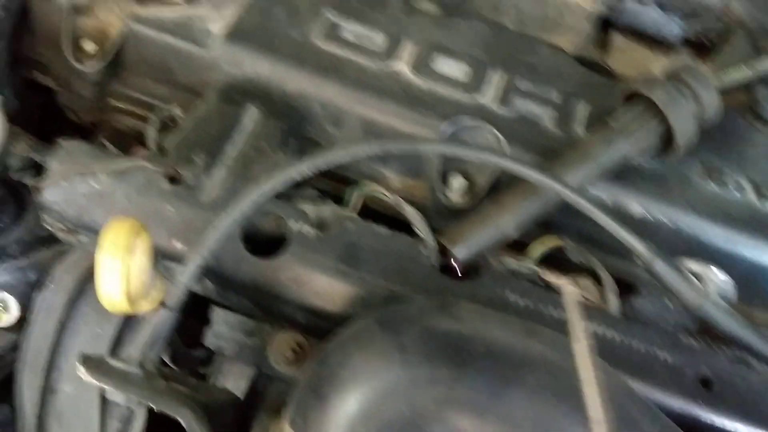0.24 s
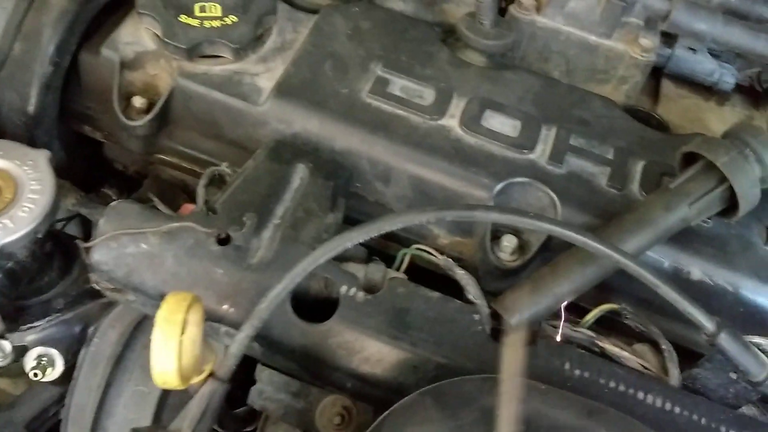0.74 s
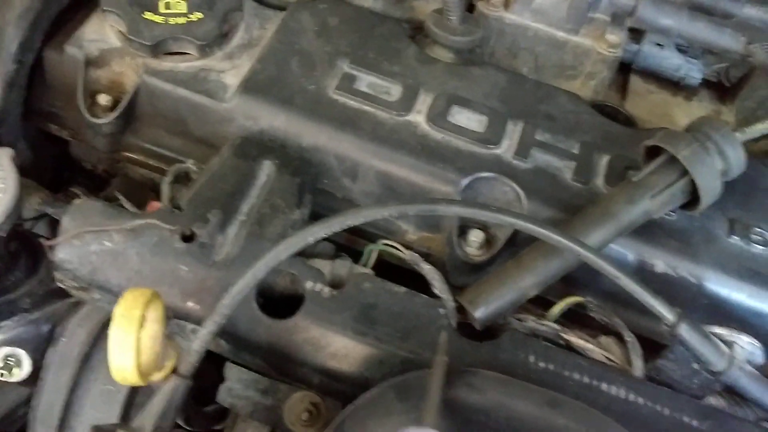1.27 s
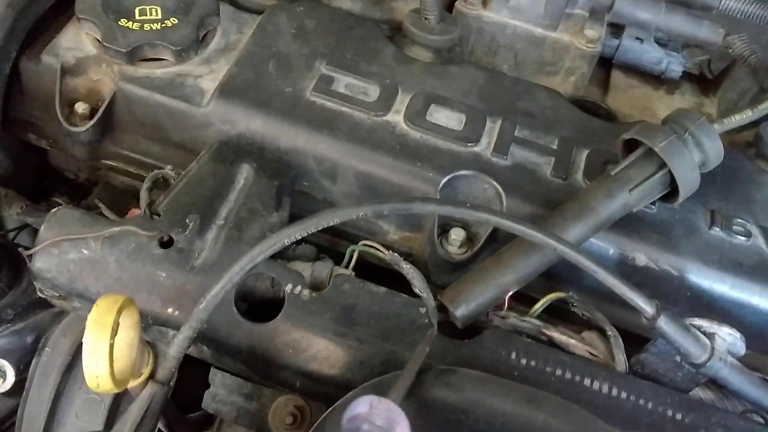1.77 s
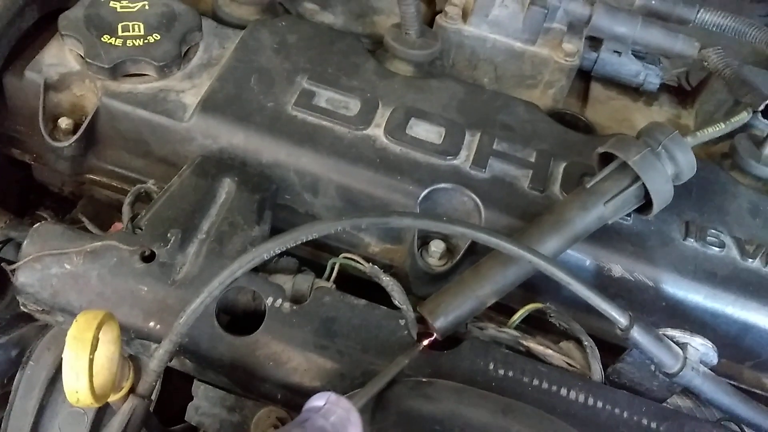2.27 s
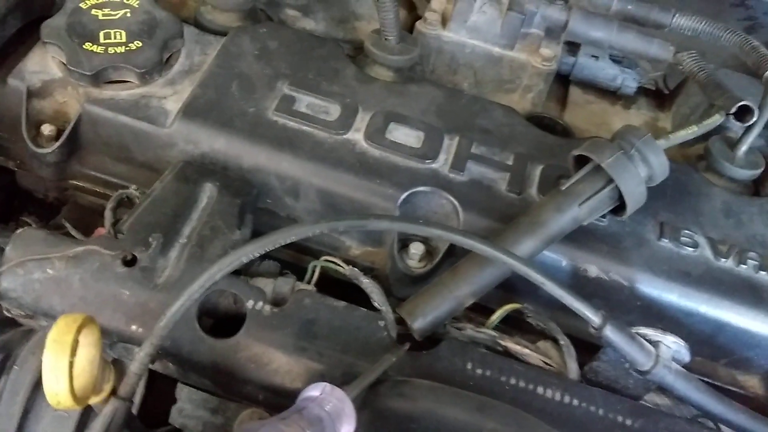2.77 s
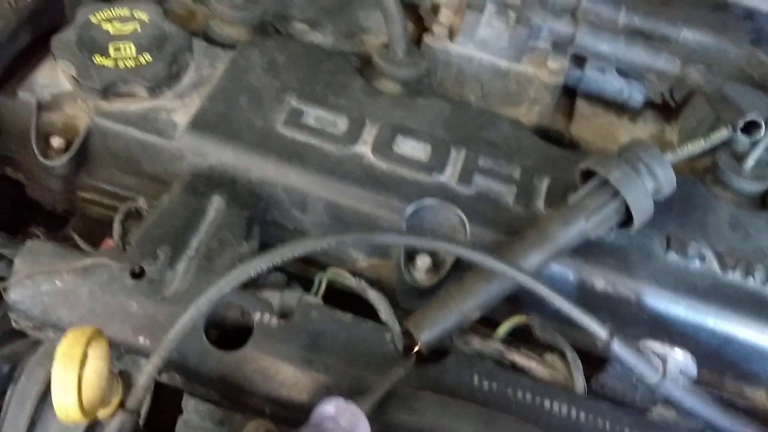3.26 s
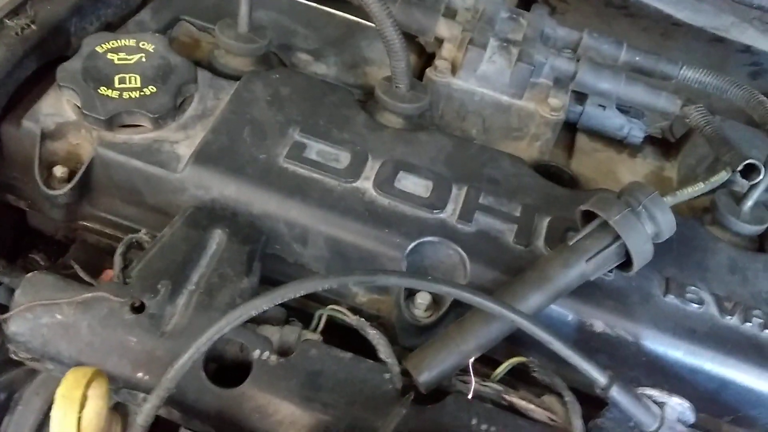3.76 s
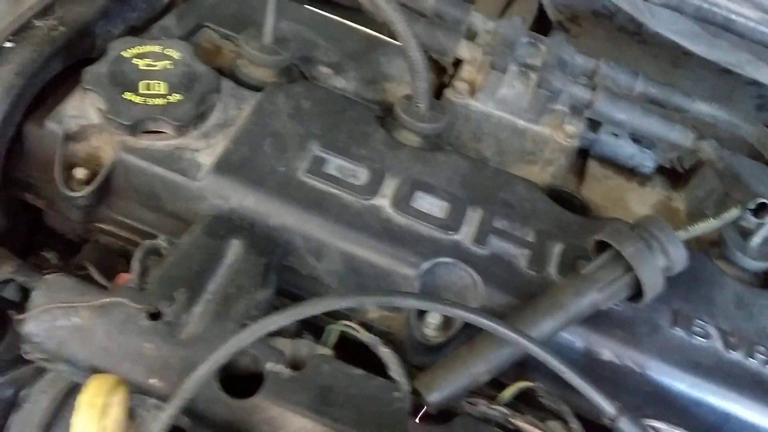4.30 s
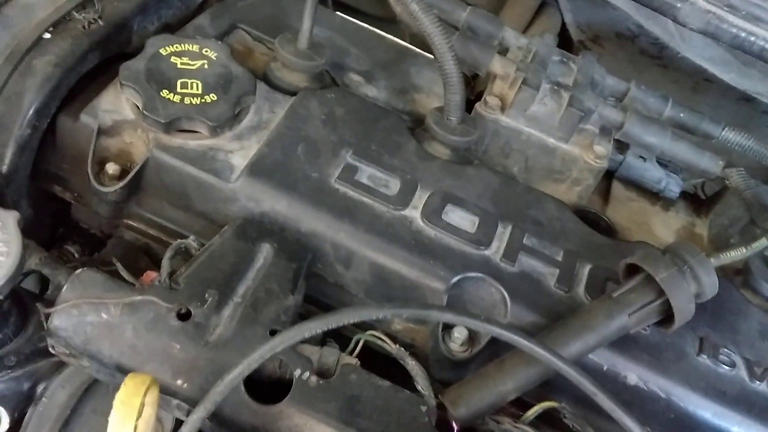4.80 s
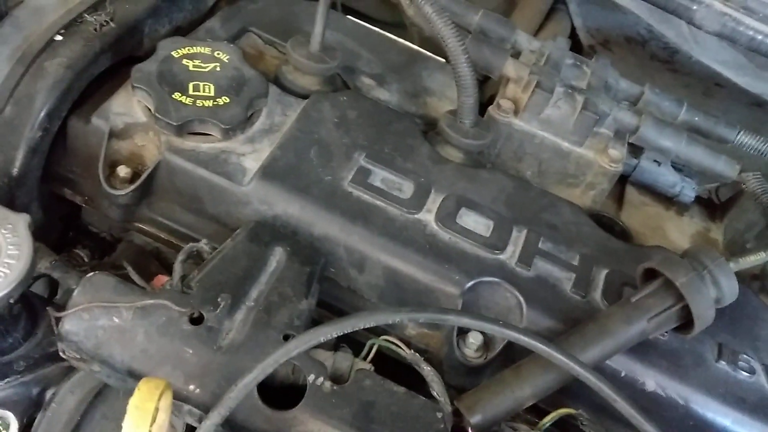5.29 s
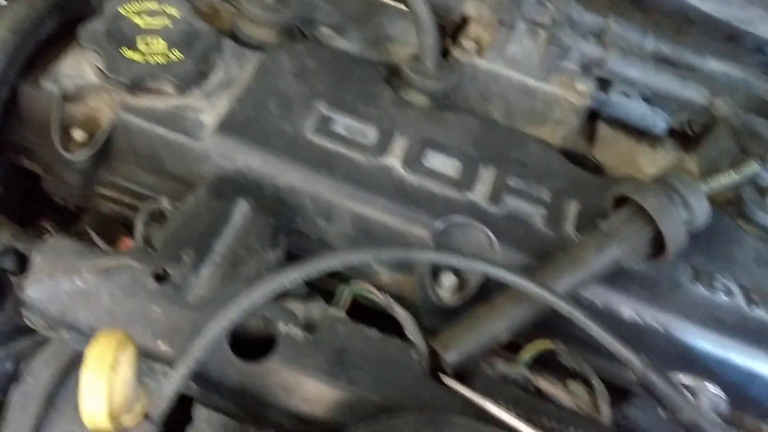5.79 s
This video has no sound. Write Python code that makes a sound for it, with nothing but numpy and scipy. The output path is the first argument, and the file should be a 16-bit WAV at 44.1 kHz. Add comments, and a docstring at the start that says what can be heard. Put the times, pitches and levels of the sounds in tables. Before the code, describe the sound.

Electric sparks snap rapidly from a loose plug lead to a metal probe and the engine, close to the microphone in an open engine bay. The snaps come many times a second with uneven gaps, mixing hollow ringing clicks and bright cracks. Beneath them the misfiring car engine keeps up a rough idle, with rushing belts, ticking valves and a wavering intake drone, swelling a little toward the end.

```python
"""Engine bay, bonnet up: a four-cylinder engine idles roughly with one plug lead pulled off.
Belts and fan rush, the block hums and booms, valves tick, the intake drones; two microphones are close by.
Once a crank turn the lead sparks: it rings its hollow boot, or snaps in the open to a probe or the engine.
Open sparks also kick the left microphone circuit. The stereo is widened; a limiter ducks after peaks."""
import sys
import numpy as np
from scipy import signal
from scipy.fft import rfft, irfft
from scipy.io import wavfile
from scipy.ndimage import uniform_filter1d, minimum_filter1d

SR = 44100
rng = np.random.default_rng(int(sys.argv[2]) if len(sys.argv) > 2 else 0)


def int16_out(signal):
    """Quantize to a 16-bit WAV file."""
    q = np.round(np.clip(np.atleast_2d(signal).T, -1, 1) * 32767)
    wavfile.write(sys.argv[1], SR, q.astype(np.int16))


N = 266628
TIME = np.arange(N) / SR
HZ = np.fft.rfftfreq(N, 1 / SR)

# idle speed: time_s, speed_rpm
IDLE_RPM = [(0, 801.13), (1, 797.54), (1.8, 795.94), (3.2, 795.17), (3.8, 796.18), (4.1, 801.14),
            (4.6, 791.67), (5.2, 796.29), (6, 803.65)]
# hum partials: crank_multiple, level_db
HUM_ORDERS = [(3, -50), (4, -47), (8, -60), (10, -52), (17, -66.5)]
# hum as the microphones move: time_s, gain_db
HUM_DB = [(0, -5), (0.9, -2.5), (1.8, -8), (3.0, 0), (3.8, -2), (5.5, 0), (6.05, 5)]
# block boom, up as the microphones lean in: time_s, level_db
BOOM_DB = [(0, -58.5), (1.3, -57.5), (1.65, -51.5), (2.0, -52), (2.85, -59), (3.2, -43.5), (3.5, -53.5),
           (4.1, -54.5), (4.5, -58), (6.05, -55)]
# machinery and intake level, louder near the end: time_s, gain_db
ENGINE_DB = [(0, -39.5), (1.0, -39.5), (1.7, -39), (2.1, -40), (2.85, -38.5), (3.5, -38), (4.2, -39),
             (4.55, -37), (4.9, -40), (5.2, -35), (5.7, -35.5), (6.05, -35.5)]
# machinery treble: time_s, gain_db
TREBLE_DB = [(0, -3.5), (1.5, -2.4), (3.6, -5), (4.3, -4), (6, -2)]
# rush of belts, fan and block: freq_hz, gain_db
WASH_SPECTRUM = [(25, -30), (50, 5), (90, -1.5), (150, 2.5), (240, -0.5), (350, -3), (500, 1.5), (800, 1.5),
                 (1200, -2.5), (1500, -2), (2000, -7), (2250, -10), (2550, -11.5), (2900, -4), (4500, -1),
                 (7000, -11), (7600, -24), (9000, -17), (14000, -25), (14700, -68), (16000, -90)]
# cover and bay resonances: centre_hz, width_hz, lift_db
COVER_MODES = [(240, 21, 1), (733, 72, -6), (846, 130, 1), (920, 50, -2.5), (1043, 86, 3), (1300, 65, 4.5),
               (1483, 50, -4), (1590, 48, 4), (1865, 65, -9.5), (1949, 130, 10.5), (3640, 360, -4.5),
               (6540, 220, 9), (12360, 2500, 7.5)]
# left/right likeness of the rush: freq_hz, correlation
WASH_CORRELATION = [(50, 0.92), (150, 1), (600, 0.64), (1200, 0.29), (2200, 0), (15000, 0.23)]
# valve tick: freq_hz, gain_db
TICK_SPECTRUM = [(300, -42), (1300, 3), (2500, -3.5), (4500, -3), (5700, -45), (7600, -11.5), (12000, -12),
                 (14000, -28), (14900, -53)]
# loose valves in the two-turn cycle: phase_turns, gain_db
CLACK_PATTERN = [(0.19, -10), (0.70, -3), (1.18, -0.5), (1.71, -1.5)]
# valve clack on the cover: freq_hz, gain_db
CLACK_SPECTRUM = [(300, -26), (1200, -2.5), (1750, -8), (1950, 5), (2200, -8), (2700, -14), (4000, -4.5),
                  (5500, -3), (6500, -3), (8000, -10), (12000, -11.5), (14000, -19), (15000, -50)]
# intake resonance: time_s, pitch_hz
INTAKE_PITCH_HZ = [(0, 566), (0.33, 548), (0.9, 572.3), (1.3, 561.8), (1.75, 580.8), (3.05, 562),
                   (3.35, 580.7), (3.53, 560), (3.95, 580), (4.7, 573), (6.05, 580)]
# intake swells as the idle stumbles: time_s, gain_db
INTAKE_DB = [(0, -3.5), (.3, 0), (.62, -4.5), (1.05, -4), (1.25, 2), (1.4, -1), (1.58, -0.5), (1.8, -2.5),
             (2.3, -4.5), (2.8, -4), (3.3, -0.5), (3.42, -6), (3.53, 4), (3.66, -6.5), (4.3, -2.5),
             (4.75, -4), (5.2, 0), (5.7, -3.5), (5.87, -1), (6.05, -2)]
# sparks at the boot: start_s, ring_db, crack_db, bright_db, pitch_hz
SPARKS_AT_BOOT = [(0.0224, -24.5, -28.5, -0.0, 4000), (0.1724, -25.5, -34.5, 3, 3970.0),
                  (0.3226, -26.5, -32.5, 3, 3930.0), (0.3968, -26.5, -33.0, -1, 3950.0),
                  (0.4725, -22.5, -28.5, 1, 3990), (0.5468, -22.5, -29.5, 1, 3940.0),
                  (0.6222, -22, -32.5, 5, 3940), (0.697, -24, -34.5, 7, 3970),
                  (0.7728, -23, -32.5, 4.5, 3970), (0.9233, -22.5, -28.5, -2, 3910),
                  (1.074, -23, -27.5, -1, 3960), (1.1479, -24, -27.5, -1.5, 3930),
                  (1.2243, -23.5, -28.5, -2, 3960.0), (1.2982, -27.5, -31.5, 1, 3980),
                  (1.375, -27.0, -33.5, 3, 3930.0), (1.449, -26.0, -30.5, 1, 3950.0),
                  (1.6758, -27.5, -34, 3, 3925), (1.9012, -26.5, -31.0, 0.5, 3895),
                  (1.9775, -25.0, -29.5, 2.5, 3940.0), (2.0522, -27, -29.0, -1.5, 3940.0),
                  (2.2032, -29, -29.5, -3, 3950), (2.279, -27, -28.5, -1, 3930.0),
                  (2.3538, -26.5, -28, 0, 3930.0), (2.8058, -29, -33.0, -0.0, 3950),
                  (2.8821, -29, -35, 0, 3990), (3.0334, -29, -31, -2, 3970.0), (3.1079, -28, -30, 0, 3880),
                  (3.1845, -29.5, -30, -3, 3960), (3.2596, -27, -24, -7, 4050), (3.3354, -26, -30, 0, 3995),
                  (3.41, -24.5, -30, -2, 4000.0), (3.486, -25, -34, 3, 4010), (3.7118, -27.5, -34, 1, 4060),
                  (3.788, -27, -35, 0, 3990), (3.9383, -31.5, -32.5, 1, 4000),
                  (4.0123, -29.5, -33, 2, 3960), (4.0875, -30, -29, -3, 4060),
                  (4.1625, -26.5, -30.5, 1, 4030), (4.3885, -24.5, -27, 3.5, 4060),
                  (4.4634, -25.5, -29.5, 2.0, 4000), (4.6147, -24.0, -31, 1, 4000),
                  (4.691, -26, -29, 2, 3970.0), (4.9173, -28.5, -30.5, 1, 3930.0),
                  (5.1446, -22, -32, 7, 3950.0), (5.219, -24.5, -26, 1.0, 3910),
                  (5.369, -22.5, -27.0, 2, 4000), (5.4455, -21, -29.5, 7, 3930), (5.596, -22, -24, 1, 3960),
                  (5.6701, -22, -21.5, 2, 4020), (5.969, -25.5, -25, -4, 4000)]
# air crack at the boot: freq_hz, gain_db
BOOT_CRACK_SPECTRUM = [(200, 5.5), (700, 8), (1400, 1), (2400, -38), (3400, 9.5), (4300, 5), (5200, 1.5),
                       (6700, 12), (8000, -1.5), (9300, 3), (12000, 1.5), (14000, -3), (15000, -28),
                       (16000, -33)]
# boot modes at a ring pitch of BOOT_REF_HZ: freq_hz, gain_db, swell_and_decay_s
BOOT_MODES = [(733, -14.5, 0.0012), (1470, -8, 0.00086), (3600, -23, 0.0003), (3941, 2.5, 0.00098),
              (4040, -19, 0.004), (6750, -7, 0.00016)]
BOOT_REF_HZ = 3950
# sparks in the open: start_s, crack_db, bright_db, kick_db, polarity
SPARKS_IN_OPEN = [(0.0965, -28, -3, -5.5, -1), (0.246, -26.5, -1, -34, 1), (0.8476, -28, -2, -10.5, 1),
                  (0.998, -27, -1, -11, 1), (1.5255, -30.5, 3.5, -8, 1), (1.5997, -27.5, 0, -33, 1),
                  (1.7514, -25, -1, -39, 1), (1.827, -20.5, -1.5, 3, -1), (2.1284, -29, 3, 9, 1),
                  (2.4303, -27, 0, -6.5, -1), (2.505, -23.5, -7, -6, -1), (2.581, -28, -0.5, -6, -1),
                  (2.655, -27, -3, -23, 1), (2.7311, -25.5, -2, -4, -1), (2.9573, -28, -2, -21, 1),
                  (3.561, -27, 1.5, -22, 1), (3.6369, -35, 6, 1, 1), (3.8627, -27.5, -3, -6.5, -1),
                  (4.2386, -27, 3.5, 5, 1), (4.313, -21, -5, 7, -1), (4.54, -23, -0.5, -20, 1),
                  (4.7664, -24.5, -2, -4.5, -1), (4.842, -29, -2, -13.5, 1), (4.9938, -38, 15, 5.5, 1),
                  (5.0685, -23, -4, 7, -1), (5.295, -26, 5, 15, 1), (5.5204, -18, -4, 8.5, -1),
                  (5.7457, -25.5, 5, -8.5, 1), (5.8195, -26.5, 2, -11, 1), (5.8949, -23.5, 0, 2, -1)]
# air crack in the open: freq_hz, gain_db
OPEN_CRACK_SPECTRUM = [(200, -5), (1400, 0), (2400, -18), (3400, 11), (4300, 10), (5400, 6.5), (6700, 11),
                       (8000, -1.5), (9300, 2), (12000, 5.5), (14000, -3.5), (15000, -20), (16000, -30)]
# stereo balance: freq_hz, left_minus_right_db
BALANCE_DB = [(100, 0.5), (500, 4), (1200, 5), (4000, 3), (7000, 2.5), (9000, -1.5), (13000, -7)]
# widener feed from the other side: freq_hz, share
WIDENER_FEED = [(50, 0.89), (280, 0.75), (600, 0.61), (1200, 0.68), (2500, 0.83), (4500, 0.27),
                (6500, 0.19), (7900, 0), (10000, 0.51), (13000, 0.34)]


def gain_of(db):
    """dB to amplitude."""
    return 10 ** (np.asarray(db) / 20)


def unit_rms(x):
    """Scale to rms 1."""
    return x / np.sqrt(np.mean(x ** 2) + 1e-20)


def over_time(table):
    """Time table to one value per sample."""
    return np.interp(TIME, *np.transpose(table))


def over_hz(table):
    """Frequency table to one value per bin, joined on a log axis."""
    hz, value = np.transpose(table)
    return np.interp(np.log(HZ + 1), np.log(hz + 1), value)


def colour(x, db):
    """Filter by a gain per bin."""
    return irfft(rfft(x) * gain_of(db), N)


def add(mix, start_s, sound):
    """Mix in at start_s."""
    part = mix[..., max(round(start_s * SR), 0):][..., :sound.shape[-1]]
    part += sound[..., :part.shape[-1]]


def drift(rate_hz):
    """Random wander up to rate_hz, rms 1."""
    return unit_rms(irfft(rfft(rng.standard_normal(N)) / (1 + (HZ / rate_hz) ** 4), N))


def narrow_band(centre_hz, width_hz):
    """Noise in one resonance, rms 1; the centre may move."""
    lowpass_db = -20 * np.log10(1 + (HZ / (0.64 * width_hz)) ** 2)
    real, imag = colour(rng.standard_normal((2, N)), lowpass_db)
    carrier = np.exp(2j * np.pi * np.cumsum(centre_hz * np.ones(N)) / SR)
    return unit_rms(((real + 1j * imag) * carrier).real)


def crank_turns(first_spark_s=0.0222):
    """Turns since the first spark."""
    turns = np.cumsum(over_time(IDLE_RPM)) / (60 * SR)
    return turns - np.interp(first_spark_s, TIME, turns)


def throb(per_turn, peak_turns):
    """Cosine locked to the crank."""
    return np.cos(2 * np.pi * per_turn * (crank_turns() - peak_turns))


def beats_s(cycles):
    """Times at which a cycle count passes a whole number."""
    return TIME[1:][np.diff(np.floor(cycles)) > 0]


def hum(waver=0.5, waver_hz=2.1, right_share=0.86):
    """Low firing orders, unsteady from the misfire."""
    turns, tone = crank_turns(), np.zeros(N)
    for order, db in HUM_ORDERS:
        amplitude = gain_of(db) * (1 + waver * drift(waver_hz))
        tone += amplitude * np.sin(2 * np.pi * (order * turns + rng.random()))
    return np.array([tone, right_share * tone]) * gain_of(over_time(HUM_DB))


def boom():
    """Narrow low resonance of the block."""
    return gain_of(over_time(BOOM_DB)) * narrow_band(centre_hz=236, width_hz=22)


def wash(firing_db=0.34, turn_swell_db=0.5, flutter_db=2.0, flutter_hz=110):
    """Rush through the cover's resonances; throbs twice a crank turn, swells slightly once a turn."""
    left, other = rng.standard_normal((2, N))
    likeness = np.clip(over_hz(WASH_CORRELATION), -1, 1)
    right = irfft(likeness * rfft(left) + np.sqrt(1 - likeness ** 2) * rfft(other), N)
    lift_db = sum(db / (1 + (2 * (HZ - hz) / width_hz) ** 2) for hz, width_hz, db in COVER_MODES)
    rush = unit_rms(colour(np.array([left, right]), over_hz(WASH_SPECTRUM) + lift_db))
    throb_db = firing_db * throb(2, peak_turns=0.074) + turn_swell_db * throb(1, peak_turns=0)
    return rush * gain_of(throb_db + flutter_db * drift(flutter_hz))


def belt(gain_db=-11, pitch_hz=6400, width_hz=380, decay_s=0.0016, jitter_s=0.00092, tug_db=3, teeth=21):
    """Timing belt teeth meet the sprocket in tiny uneven chirps, louder as each firing tugs."""
    starts_s = beats_s(crank_turns() * teeth)
    t, out = np.arange(256) / SR, np.zeros((2, N))
    for start_s, size in zip(starts_s, rng.exponential(1, len(starts_s))):
        late_s = jitter_s * rng.standard_normal()
        chirp = rng.standard_normal((2, len(t))) * np.exp(-t / decay_s)
        add(out, start_s + late_s, min(size, 3) * chirp)
    out *= gain_of(tug_db * throb(2, peak_turns=0.054))
    resonance_db = -20 * np.log10(1 + ((HZ - pitch_hz) / width_hz) ** 2)
    return gain_of(gain_db) * unit_rms(colour(out, resonance_db))


def tappets(gain_db=-8, spread_db=2.5, decay_s=0.0085, jitter_s=0.0015, per_turn=8):
    """Closing valves, each a short uneven tick."""
    starts_s = beats_s(crank_turns() * per_turn)
    t, out = np.arange(512) / SR, np.zeros((2, N))
    for start_s, (size, late) in zip(starts_s, rng.standard_normal((len(starts_s), 2))):
        tick = rng.standard_normal((2, len(t))) * np.exp(-t / decay_s)
        add(out, start_s + jitter_s * late, gain_of(spread_db * min(size, 2)) * tick)
    return gain_of(gain_db) * unit_rms(colour(out, over_hz(TICK_SPECTRUM)))


def loose_valves(gain_db=-10, spread_db=3, decay_s=0.0046, jitter_s=0.0012):
    """Valves with too much play clack in an uneven pattern, each once in two turns."""
    t, out = np.arange(1024) / SR, np.zeros((2, N))
    for phase_turns, db in CLACK_PATTERN:
        starts_s = beats_s((crank_turns() - phase_turns) / 2)
        for start_s, (size, late) in zip(starts_s, rng.standard_normal((len(starts_s), 2))):
            clack = rng.standard_normal((2, len(t))) * np.exp(-t / decay_s)
            add(out, start_s + jitter_s * late, gain_of(db + spread_db * min(size, 1.5)) * clack)
    return gain_of(gain_db) * unit_rms(colour(out, over_hz(CLACK_SPECTRUM)))


def bay_reflections(x, ripple_db=1.56, fade_hz=4500, width_bins=420):
    """Reflections among engine parts: fine static peaks and dips, fading in the treble."""
    ripple = unit_rms(uniform_filter1d(rng.standard_normal(len(HZ)), width_bins))
    return colour(x, ripple_db * ripple / (1 + (HZ / fade_hz) ** 2))


def intake(gain_db=-1.5, firing_db=2.0, rough_db=2.5, rough_hz=20, right_share=0.6):
    """Air drawn in twice a turn sounds the intake's wandering resonance in rough swells."""
    air = narrow_band(over_time(INTAKE_PITCH_HZ), width_hz=80)
    swell_db = over_time(INTAKE_DB) + rough_db * drift(rough_hz)
    air *= gain_of(gain_db + swell_db + firing_db * throb(2, peak_turns=0.097))
    return np.array([air, right_share * air])


def engine(machinery_db=3.0, unsteady_db=1.29, unsteady_hz=4, treble_hz=4500):
    """Rough idle: machinery and intake waver in level over hum and boom."""
    machinery = bay_reflections(wash() + tappets() + loose_valves() + belt())
    treble = colour(machinery, -20 * np.log10(1 + (treble_hz / (HZ + 1)) ** 4))
    machinery += (gain_of(over_time(TREBLE_DB)) - 1) * treble
    gain_db = over_time(ENGINE_DB) + unsteady_db * drift(unsteady_hz)
    return gain_of(gain_db) * (gain_of(machinery_db) * machinery + intake()) + hum() + boom()


def boot_ring(gain_db=3.5, echo_db=-18, echo_s=0.011, bonnet_db=-20, bonnet_s=0.0048,
              right_db=-12.0, right_late_s=0.00027):
    """A spark at the rubber tube's mouth rings the air inside; the raised bonnet returns it."""
    t, out = np.arange(1536) / SR, np.zeros((2, N))
    for start_s, ring_db, _, _, pitch_hz in SPARKS_AT_BOOT:
        ring = np.zeros(len(t))
        for hz, db, tau_s in BOOT_MODES:
            envelope = gain_of(db) * t / tau_s * np.exp(1 - t / tau_s)
            ring += envelope * np.sin(2 * np.pi * hz * pitch_hz / BOOT_REF_HZ * t)
        paths = rng.standard_normal((2, len(t))) * np.exp(-t / echo_s)
        paths *= gain_of(echo_db) / np.linalg.norm(paths[0])
        paths[:, 0] = 1  # direct path
        add(paths, bonnet_s, gain_of([bonnet_db]))
        left, right = gain_of(ring_db + gain_db) * signal.fftconvolve(paths, ring[None], axes=1)
        add(out[0], start_s, left)
        add(out[1], start_s + right_late_s, gain_of(right_db) * right)
    return out


def spark_cracks(sparks, spectrum, gain_db, shock, rise_s, scatter_s=0.0026,
                 tail_db=-19, tail_s=0.017, arc_wander=0.93, bright_hz=7800, length_spread=0.55):
    """Shock wave, scatter off nearby metal, short bay tail; arcs vary in brightness and length."""
    t, out = np.arange(2048) / SR, np.zeros((2, N))
    treble = 1 - 1 / (1 + (np.fft.rfftfreq(len(t), 1 / SR) / bright_hz) ** 8)
    surfaces = rng.standard_normal((2, len(t)))  # common to all arcs
    rise = 1 - np.exp(-t / rise_s)
    tail = gain_of(tail_db) * np.exp(-t / tail_s)
    for start_s, crack_db, bright_db in sparks:
        stretch = np.exp(length_spread * rng.uniform(-0.58, 1))
        scatter = np.exp(-t / (scatter_s * stretch)) / np.sqrt(stretch)
        paths = unit_rms(surfaces + arc_wander * rng.standard_normal(surfaces.shape))
        snap = paths * rise * (scatter + tail)
        snap[:, 8] += shock
        add(out, start_s, irfft(rfft(snap) * gain_of(crack_db + gain_db + bright_db * treble)))
    return colour(out, over_hz(spectrum))


def electrical_kicks(cut_hz=62, coupling_hz=14, top_hz=2700, overload_db=10.0):
    """Open sparks induce a voltage step, left only; the bass cut makes it a thump, the largest clip."""
    circuit = np.vstack([signal.butter(4, cut_hz, "high", fs=SR, output="sos"),
                         signal.butter(1, coupling_hz, "high", fs=SR, output="sos"),
                         signal.butter(1, top_hz, fs=SR, output="sos")])
    thump = signal.sosfilt(circuit, np.ones(4096))
    out = np.zeros((2, N))
    for start_s, _, _, kick_db, polarity in SPARKS_IN_OPEN:
        add(out[0], start_s, np.copysign(gain_of(kick_db), polarity) * thump)
    return np.clip(out, -gain_of(overload_db), gain_of(overload_db))


def scene():
    """Engine and sparks at the two microphones."""
    at_boot = [(start_s, db, bright_db) for start_s, _, db, bright_db, _ in SPARKS_AT_BOOT]
    in_open = [(start_s, db, bright_db) for start_s, db, bright_db, _, _ in SPARKS_IN_OPEN]
    airborne = engine()
    airborne += spark_cracks(at_boot, BOOT_CRACK_SPECTRUM, gain_db=2.0, shock=0.12, rise_s=0.0006)
    airborne += spark_cracks(in_open, OPEN_CRACK_SPECTRUM, gain_db=-0.5, shock=1.0, rise_s=0.0001)
    airborne += boot_ring()
    sides_db = np.array([[0.5], [-0.5]]) * over_hz(BALANCE_DB)
    return colour(airborne, sides_db) + electrical_kicks()


def widen(x, delay_s=0.000396):
    """Each side gets the other, late and inverted: a comb filter."""
    feed = np.clip(over_hz(WIDENER_FEED), 0, 0.95) * np.exp(-2j * np.pi * HZ * delay_s)
    return x - irfft(feed * rfft(x[::-1]), N)


def limit(x, ceiling_db=-5.0, hold_s=0.059, recover_db_per_s=17.5, smooth_samples=28):
    """Peaks pull the gain down at once; it holds, then recovers."""
    peak_db = 20 * np.log10(abs(uniform_filter1d(abs(x).max(0), smooth_samples)) + 1e-9)
    over_db = np.maximum(peak_db - ceiling_db, 0)
    half_hold = int(hold_s * SR / 2)
    held_db = -minimum_filter1d(-over_db, 2 * half_hold + 1, origin=half_hold)
    recovery_db = recover_db_per_s * TIME
    duck_db = np.maximum.accumulate(held_db + recovery_db) - recovery_db
    return x / gain_of(uniform_filter1d(duck_db, smooth_samples))


def record(dry, edge_hz=15600):
    """Widener, limiter, clipping, band limit."""
    clipped = np.clip(limit(widen(dry)), -1, 1)
    lowpass = signal.firwin(127, edge_hz, window=("kaiser", 9), fs=SR)
    return signal.oaconvolve(clipped, lowpass[None], "same")


dry = scene()
out = record(dry)
int16_out(out)
```